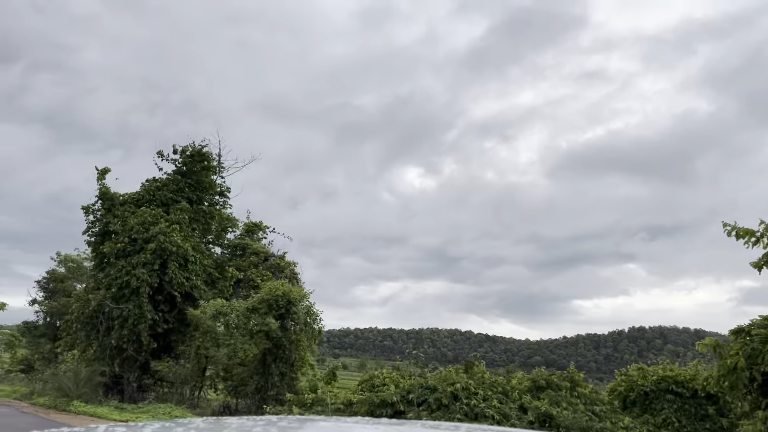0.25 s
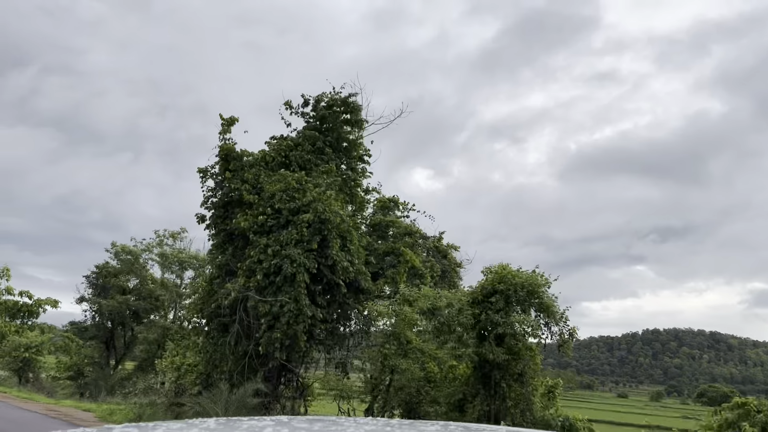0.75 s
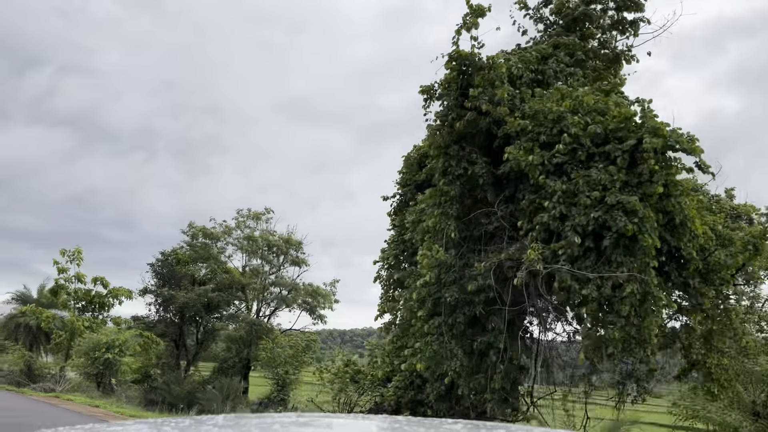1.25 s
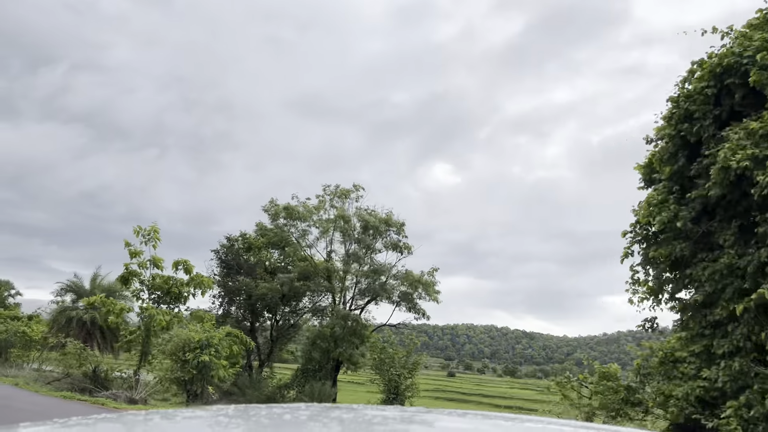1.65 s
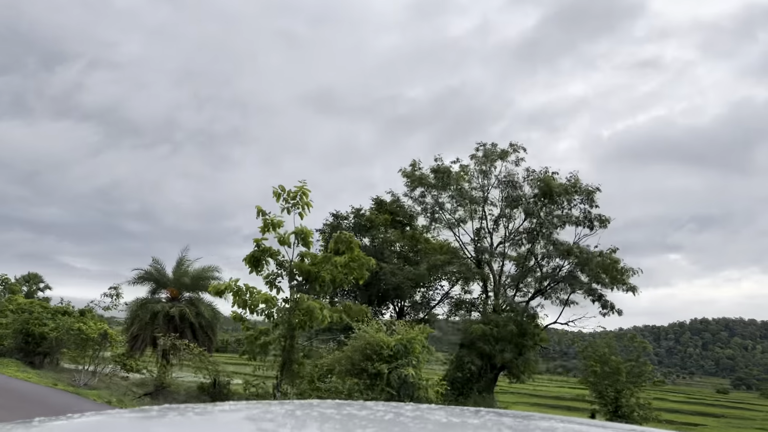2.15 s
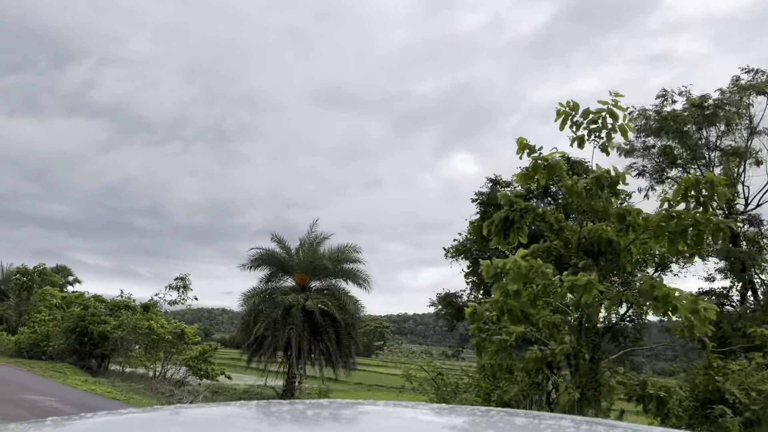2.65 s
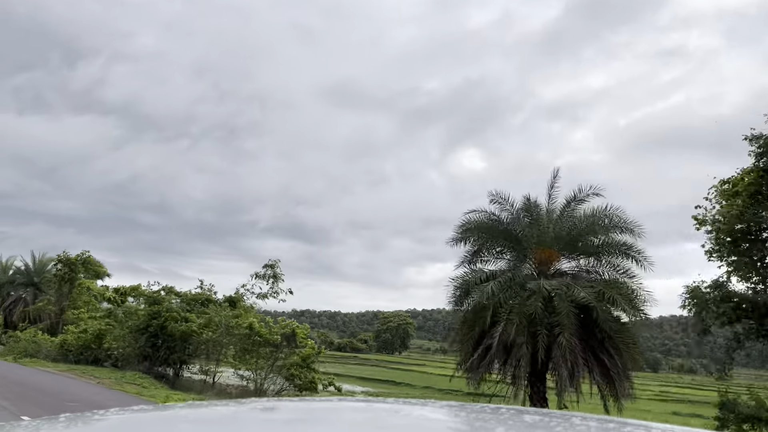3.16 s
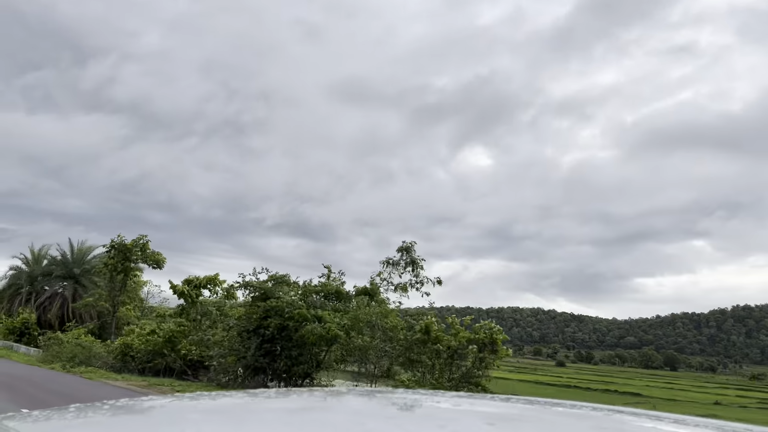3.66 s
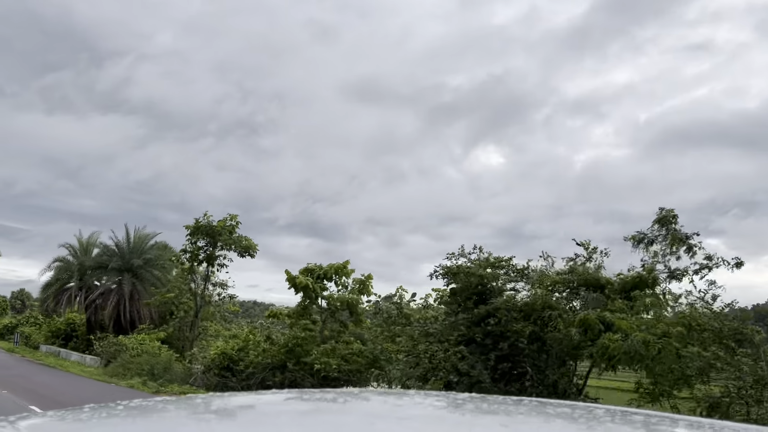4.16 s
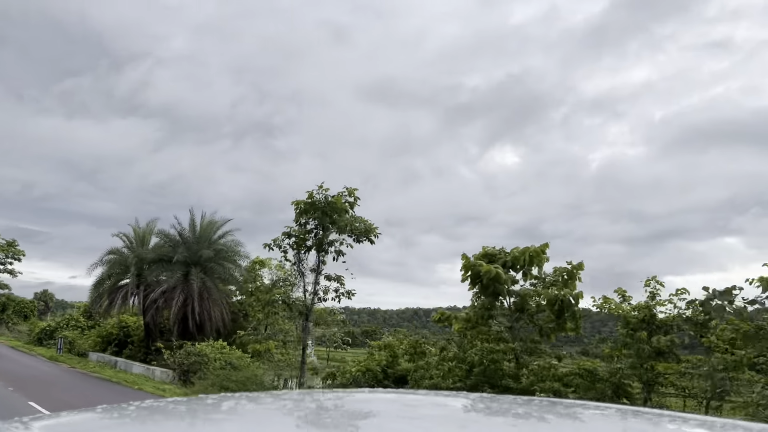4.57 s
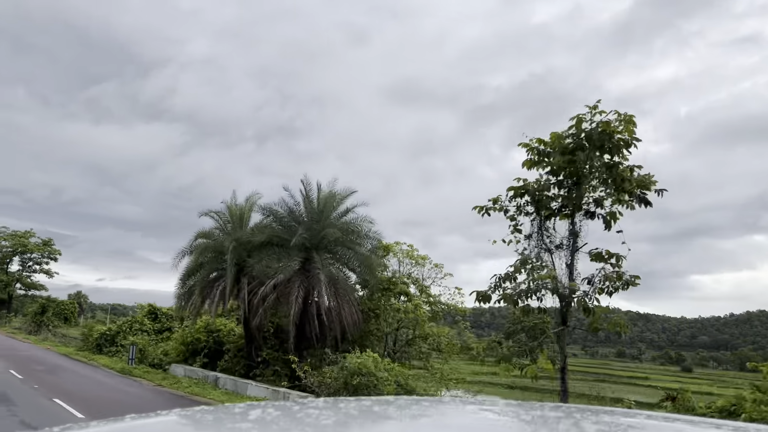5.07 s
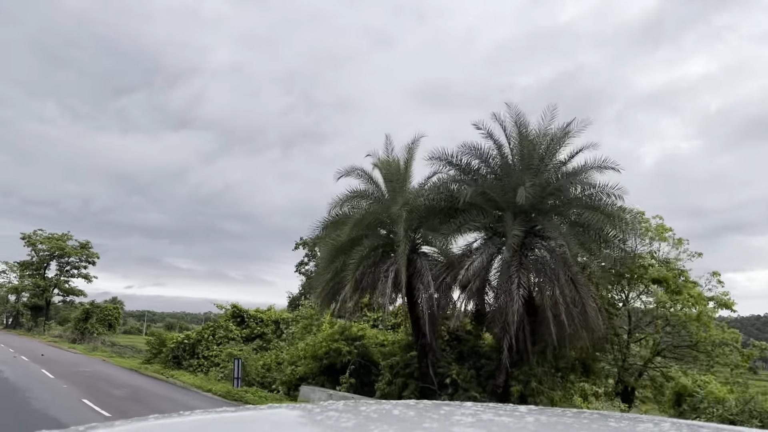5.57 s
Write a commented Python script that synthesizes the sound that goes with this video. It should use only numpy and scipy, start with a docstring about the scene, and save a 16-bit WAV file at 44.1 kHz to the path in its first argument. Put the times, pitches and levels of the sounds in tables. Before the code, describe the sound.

Steady rush of air and tyre noise from a moving car, heard on an unshielded phone held out of the window. Low rumble, breathy midrange rush and faint hiss flutter quickly. Thumps, rasps and pops cluster early, peak between about 1.2 and 1.8 seconds, thin out in the middle, then return hard near 4.9 and from 5.3 to 5.8 seconds.

```python
"""Wind on a phone held out of a moving car's window

A steady rush of tyres and slipstream: shaped noise in three parts (rumble, rush, hiss) that flutters
on the two microphone ports and swells in gusts. Big eddies hit as a rasp of resonant noise and a thump,
a swing that falls in pitch; small ones are short swings heard as pops and ticks. Flow tearing off
the case gives short, rasping bursts of resonant noise."""
import sys
import numpy as np
from scipy import signal
from scipy.fft import rfft, irfft
from scipy.io import wavfile

SR = 44100
rng = np.random.default_rng(int(sys.argv[2]) if len(sys.argv) > 2 else 0)


def generate_wav(sig):
    """Save sig (samples, or channels by samples) to the path in sys.argv[1] as 16-bit PCM at SR."""
    pcm = np.round(np.clip(np.atleast_2d(sig).T, -1, 1) * 32767).astype(np.int16)
    wavfile.write(sys.argv[1], SR, pcm)


N = 256662
TIME = np.arange(N) / SR
FREQS = np.maximum(np.arange(N // 2 + 1) * SR / N, 1)

# big eddies on the ports: (time [s], thump peak [dB], pitch at the peak [Hz], rasp level before trim [dB],
# rasp length [s], spread of the thump in log age [0.3 short to 0.7 long-tailed])
BIG_EDDIES = [(0.035, -11, 111, -19, 0.0018, 0.42), (0.073, -16, 90, -43, 0.0034, 0.38),
              (0.134, -10, 72, -23, 0.0036, 0.35), (0.273, -13, 84, -30, 0.0055, 0.54),
              (0.322, -13.5, 202, -24, 0.0062, 0.88), (0.74, -22, 87.5, -32, 0.0036, 0.34),
              (0.824, -13.5, 111, -24, 0.0064, 0.74), (0.982, -11.5, 170, -25, 0.0052, 0.39),
              (1.159, -11, 90, -42, 0.0037, .45), (1.2625, -2, 264, -19, 0.0057, 0.55),
              (1.337, -13.5, 190, -30, .003, 0.46), (1.381, -16, 115, -34, .004, .4),
              (1.433, -13, 105, -24, 0.0018, 0.64), (1.6676, -2, 119, -13.5, 0.0038, 0.49),
              (1.808, -0.5, 136, -22, 0.003, 0.55), (2.28, -15, 85, -43, 0.0024, 0.28),
              (2.3093, -9, 165, -28, 0.0045, 0.38), (3.565, -9, 192, -24.5, 0.0064, 0.47),
              (3.929, -14, 105, -22.5, 0.0048, 0.37), (4.2835, -13, 190, -21, 0.0056, 0.88),
              (4.368, -18, 82, -37, 0.0033, 0.34), (4.854, -12, 150, -26, 0.0027, 0.5),
              (4.8817, 0.5, 133, -21.5, 0.0039, 0.48), (5.072, -11.5, 114, -34, 0.0044, 0.65),
              (5.155, -25, 170, -35, .003, 0.41), (5.218, -12.5, 82, -29, .004, .4),
              (5.313, -6.5, 83.5, -40, .004, 0.34), (5.372, -9.5, 125, -27, 0.0036, 0.36),
              (5.4424, -2, 246, -19, 0.003, 0.31), (5.474, -8.5, 184, -20, 0.0025, 0.5),
              (5.505, -6.5, 310, -21, 0.003, 0.42), (5.553, -13.5, 82, -29, 0.0035, 0.45),
              (5.709, -12, 103, -38, .004, 0.39), (5.7578, -7.5, 280, -21.5, 0.0062, 0.71)]


def from_db(db):
    """Decibels to gain."""
    return 10 ** (np.asarray(db) / 20)


def rms_one(x):
    """Scale to unit power."""
    return x / np.sqrt(np.mean(x ** 2) + 1e-20)


def over_hz(points):
    """Read (Hz, value) points along a log-frequency axis."""
    hz, value = np.transpose(points)
    return np.interp(np.log(FREQS), np.log(hz), value)


def drift(rate_hz):
    """Random wobble of unit rms at around the given rate."""
    ratio = FREQS / rate_hz
    spectrum = rfft(rng.standard_normal(N))
    return rms_one(irfft(spectrum * ratio / (1 + ratio ** 2) ** 2, N))


def airflow():
    """Levels of rumble, rush and hiss in dB: all follow the slipstream and change in each gust."""
    # slipstream strength, used relative to its mean: (time [s], level [dB])
    flow_points = [(0.0, -46), (0.19, -46.5), (1.15, -47.5), (1.47, -46), (3.63, -51), (3.71, -51),
                   (4.73, -51), (5.24, -48.5), (5.82, -50)]
    # gusts: (crest time [s], Gaussian half length [s], rush rise [dB], rumble rise [dB], hiss rise [dB])
    gusts = [(0.114, 0.0755, 1.5, 3, 0), (0.708, 0.075, 4, 5, 4), (1.299, 0.0551, 5, 5.5, 5),
             (1.82, 0.105, 2.5, -0.5, 2), (2.316, 0.049, 4, 6.5, 2), (2.613, 0.0775, 2.5, 3, 1.5),
             (3.97, .11, 4, 3.5, 0.5), (4.388, 0.08, 0, 2, 1), (4.924, 0.0686, 3.5, 3, 0.5),
             (5.25, .09, 4, 1.5, 1.5), (5.65, 0.161, 2.5, 4, 0.2)]
    # level at mean flow outside gusts [dB], gain per dB of flow [dB]
    rumble_db, rumble_follows = -26, 0.76
    rush_db, rush_follows = -27.5, 0.43
    hiss_db, hiss_follows = -42, 0.82

    flow_db = np.interp(TIME, *np.transpose(flow_points))
    flow_db = flow_db - flow_db.mean()
    rises = np.zeros((3, N))
    for crest_s, half_length_s, *rises_db in gusts:
        swell = np.exp(-.5 * ((TIME - crest_s) / half_length_s) ** 2)
        rises += np.outer(rises_db, swell)
    rush_rise, rumble_rise, hiss_rise = rises
    return (rumble_db + rumble_follows * flow_db + rumble_rise,
            rush_db + rush_follows * flow_db + rush_rise,
            hiss_db + hiss_follows * flow_db + hiss_rise)


def air_noise(colour):
    """Port noise: long waves arrive alike; short ones differ, higher ones earlier on the right."""
    # left-right likeness, clipped to 0-1: (frequency [Hz], likeness [-])
    likeness = [(420, 1), (520, 0.87), (700, 0.29), (1000, 0.32), (1400, -0.45), (1700, -0.1), (2000, 0.52),
                (2700, 0.2), (3700, -0.46), (4600, 0.1), (6000, 0.4), (7500, 0.37), (9000, 1.8),
                (11000, -0.8)]
    # port balance: (frequency [Hz], left minus right [dB])
    balance = [(350, 0), (500, 0), (1200, -0.5), (1680, 3), (1820, 0.5), (2200, 1), (3500, 3.5), (5300, 7),
               (7200, -1), (8500, 0)]
    port_lag_s, lag_above_hz = .00037, 3520
    lag_top_hz = 3 / port_lag_s   # the phase shift grows no further above this

    alike = np.clip(over_hz(likeness), 0, 1)
    mid, side = rfft(rng.standard_normal((2, N)))
    signs = np.array([[1], [-1]])   # left, right
    ports = np.sqrt(1 + alike) * mid + signs * np.sqrt(1 - alike) * side
    gain = from_db(over_hz(colour) + signs * over_hz(balance) / 2)
    lag_s = port_lag_s / (1 + (lag_above_hz / FREQS) ** 20)
    shift = np.exp(-1j * np.pi * signs * np.minimum(FREQS, lag_top_hz) * lag_s)
    return rms_one(irfft(ports * gain * shift, N))


def patchy(noise, patchy_db, rate_hz, lowest_hz=250, count=11):
    """Eddies of different sizes come and go on their own: each half octave flutters by itself."""
    spectrum = rfft(noise)
    band = np.clip(2 * np.log2(FREQS / lowest_hz), 0, count - 1)
    total = np.zeros((2, N))
    for k in range(count):
        part = irfft(spectrum * np.maximum(1 - abs(band - k), 0), N)
        total += part * from_db(patchy_db * drift(rate_hz))
    return rms_one(total)


def stream(noise, level_db, flutter_db):
    """One part of the air noise, fluttering about its level."""
    return from_db(level_db) * rms_one(from_db(flutter_db)) * noise


def add_eddy(track, s, peak_db, hz, turns, spread):
    """A pressure swing whose cycles lengthen as the eddy widens and drifts off."""
    front_share = 0.76   # builds up faster than it drifts off
    span = slice(max(int((s - turns / hz) * SR), 0), int((s + 10 / hz) * SR))
    log_age = np.log(np.maximum(1 + (TIME[span] - s) * hz / turns, 1e-6))
    width = spread * np.where(log_age < 0, front_share, 1)
    envelope = np.exp(-.5 * (log_age / width) ** 2)
    track[span] -= from_db(peak_db) * envelope * np.sin(2 * np.pi * turns * log_age)


def small_eddies(carrier_db, over_db, low_hz, high_hz, count, scatter_db=-1.5, spread=0.41):
    """Lesser eddies come at random, as strong as the turbulence that carries them."""
    out = np.zeros(N)
    for when, size, strength in rng.random((count, 3)):
        peak_db = carrier_db[int(when * N)] + over_db + scatter_db * (2 * strength - 1)
        hz = low_hz * (high_hz / low_hz) ** size
        add_eddy(out, when * N / SR, peak_db, hz, turns=2.6, spread=spread)
    return out


def stray_bursts(carrier_db, count, over_db=1.5, length_s=0.002, low_hz=650, high_hz=1900):
    """Faint sputters at random, oftener and louder in strong flow: (s, dB, length s, centre Hz)."""
    chance = np.cumsum(from_db(carrier_db) ** 2)
    rows = []
    for when, size, stretch in rng.random((count, 3)):
        at = np.searchsorted(chance, when * chance[-1])
        hz = low_hz * (high_hz / low_hz) ** size
        rows.append((at / SR, carrier_db[at] + over_db, length_s * (.5 + stretch), hz))
    return rows


def buffet_bursts():
    """Each big eddy rasps just before it thumps: (s, dB, length s, centre Hz)."""
    lead_cycles, rasp_hz = 0.57, 715
    return [(s - lead_cycles / hz, rasp_db, length_s, rasp_hz)
            for s, _, hz, rasp_db, length_s, _ in BIG_EDDIES]


def rasps(bursts, level_db, sharpness, grain_db=2.0, grain_hz=380, rise=0.79, fall=2.06):
    """Coarse noise centred on the vortex-shedding rate; each swell rises faster than it falls."""
    # noise colour: (frequency [Hz], relative level per Hz [dB])
    rasp_colour = [(150, 17.5), (400, 10), (1200, 8.5), (1700, 8), (2100, -0.5), (3500, -9), (4300, -14),
                   (5500, -17), (8000, -25), (12000, -45)]
    noise = air_noise(rasp_colour)
    out = np.zeros((2, N))
    grain = from_db(grain_db * drift(grain_hz))
    for s, crest_db, length_s, hz in bursts:
        span = slice(max(int((s - .1) * SR), 0), int((s + .1) * SR))
        shed = signal.lfilter(*signal.iirpeak(hz, sharpness, fs=SR), noise[:, span])
        since_s = TIME[span] - s
        swell = np.exp(-.5 * (since_s / (length_s * np.where(since_s < 0, rise, fall))) ** 2)
        burst = rms_one(swell * shed * grain[span])
        swell_rms = np.sqrt(np.mean(swell ** 2))   # refers the level to the crest
        out[:, span] += from_db(crest_db + level_db) * swell_rms * burst
    return out


def sharp_pops():
    """Small, tight eddies crack on the ports, often harder on one than on the other."""
    # pops: (time [s], peak before trim and port share [dB], pitch at the peak [Hz], left minus right [dB])
    pop_rows = [(0.0648, -13, 900, 2), (0.0926, -21, 2600, -7), (0.1226, -18, 2800, 12),
                (0.1275, -22, 1050, -5), (0.2085, -18, 2200, 12), (0.2431, -13, 733, 0),
                (0.2598, -12.5, 850, 2), (0.5141, -20.5, 780, -6), (0.6034, -14, 775, 2),
                (1.2144, -13.5, 1140, -4), (1.2606, -13, 2970, 3), (1.2655, -7.5, 1500, 2),
                (1.303, -10.5, 1100, 3), (1.3088, -12.5, 650, 0), (1.3532, -12, 2240, 4),
                (1.3702, -16.5, 1010, -1), (1.4258, -16.5, 2100, 7), (1.6097, -13, 1060, -4),
                (1.6612, -10.5, 2700, 5), (1.6635, -3.5, 580, 1), (1.6682, -14, 2400, 2),
                (1.7925, -7, 1110, -5), (1.796, -17, 950, -1), (1.7997, -5, 870, 9), (1.8025, -15, 450, 3),
                (2.2766, -13, 970, 2), (2.2987, -18, 2700, 13), (2.305, -14, 1150, 3),
                (2.3088, -8, 627, -2), (2.3097, -18, 2940, 7), (2.357, -10, 696, 0), (2.5203, -14, 650, -4),
                (2.6342, -16, 800, -2), (2.8895, -14.5, 990, -1), (3.0733, -16.5, 925, -2),
                (3.2408, -16, 700, -4), (4.2785, -15, 905, 3), (4.8766, -11.5, 1170, 6),
                (4.8814, -16.5, 2200, 3), (5.2104, -22, 940, -1), (5.3634, -17, 2540, 17),
                (5.4452, -23, 3110, 8), (5.4595, -19, 990, 0), (5.4765, -10.5, 720, 4),
                (5.5083, -8, 1040, 2), (5.5372, -13, 1080, 5), (5.7463, -24, 3000, -10),
                (5.752, -22, 2500, 4)]
    trim_db, turns_at_1khz, spread = -1, 2.1, 0.32
    ring = 0.18   # exponent: how much longer higher pops ring, in swings
    out = np.zeros((2, N))
    for s, peak_db, hz, pan_db in pop_rows:
        shares = rms_one(from_db(np.array([pan_db, -pan_db]) / 2))
        turns = turns_at_1khz * (hz / 1000) ** ring
        for port, share in zip(out, shares):
            add_eddy(port, s, peak_db + trim_db + 20 * np.log10(share), hz, turns, spread)
    return out


def thumps(turns=1.49):
    """Big eddies, felt alike by both ports; a weaker, wider eddy follows each fast, high-pitched one."""
    wake_db, wake_delay_s, wake_hz, wake_spread = -13, 0.011, 69, 0.32
    wake_above_hz = 148
    out = np.zeros(N)
    for s, peak_db, hz, _, _, spread in BIG_EDDIES:
        add_eddy(out, s, peak_db, hz, turns, spread)
        if hz > wake_above_hz:
            add_eddy(out, s + wake_delay_s, peak_db + wake_db, wake_hz, turns, wake_spread)
    return out


def scene():
    """Rumble, rush and hiss flutter, more deeply in gusts; eddies and rasps ride on top."""
    # noise colours: (frequency [Hz], relative level per Hz [dB])
    rumble_colour = [(20, -35), (30, -21), (40, -9.5), (63, 1), (100, -3), (160, -7.5), (230, -9.5),
                     (330, -19.5), (600, -73)]
    rush_colour = [(130, -91), (220, -2.5), (300, 2), (450, 0.5), (720, -0.5), (1000, -2.5), (1400, -5),
                   (1680, -7.5), (1830, -15), (2600, -65)]
    hiss_colour = [(1400, -42), (1850, 0.4), (2400, -0.5), (3200, -3.5), (4000, -7.5), (5200, -11.5),
                   (6700, -16.5), (8000, -18.5), (9500, -23), (11000, -21), (12300, -48), (15000, -28)]
    # flow tearing off the case: (time [s], crest rms before trim [dB], length [s], centre [Hz])
    tears = [(.208, -22, 0.0052, 1250), (.209, -32, .003, 2500), (.3165, -24.5, .002, 600),
             (.672, -35, 0.0066, 2420), (.716, -25.5, 0.0056, 2470), (.718, -24.5, 0.01, 950),
             (.729, -37, .004, 2500), (.738, -30, 0.0035, 1300), (.978, -30, 0.0065, 950),
             (1.238, -31, .003, 2700), (1.25, -19, 0.0055, 1150), (1.263, -19.5, .0025, 2100),
             (1.302, -22, .005, 750), (1.3055, -17.5, 0.002, 2040), (1.317, -24, .004, 1150),
             (1.371, -22, 0.0028, 1390), (1.663, -22.5, 0.0023, 2300), (1.6635, -13.5, 0.0021, 490),
             (1.6635, -29, .0022, 3900), (1.7945, -21, 0.0037, 1100), (1.801, -29, .004, 2100),
             (2.3, -25.5, 0.0031, 2750), (2.321, -24, 0.0064, 480), (2.632, -27.5, 0.002, 2200),
             (3.904, -33.5, 0.0057, 2630), (4.034, -36, 0.0053, 2390), (4.061, -29.5, .006, 1600),
             (4.08, -27.5, .012, 780), (5.3555, -20, 0.0017, 1050), (5.361, -18.5, 0.002, 796),
             (5.446, -27, .002, 1650), (5.445, -30.5, .002, 3400), (5.503, -27, .002, 1600),
             (5.503, -33.5, .002, 3200), (5.751, -32, .0025, 3400), (5.7545, -22, 0.0022, 1600)]

    rumble_db, rush_db, hiss_db = airflow()
    gust = from_db(.5 * (rush_db - rush_db.mean()))
    flutter_db = gust * (drift(59) + 0.53 * drift(12.0))
    rumble_flutter_db = 1.3 * gust * drift(21) + 0.7 * flutter_db
    rumble = stream(air_noise(rumble_colour), rumble_db, rumble_flutter_db)
    rush_noise = patchy(air_noise(rush_colour), patchy_db=1.5, rate_hz=27.3)
    rush = stream(rush_noise, rush_db, 0.78 * flutter_db)
    hiss_noise = patchy(air_noise(hiss_colour), patchy_db=0.75, rate_hz=19, lowest_hz=1790, count=5)
    hiss = stream(hiss_noise, hiss_db, 0.88 * flutter_db)

    puffs = small_eddies(rumble_db, over_db=-0.5, low_hz=148, high_hz=560, count=110)
    # the tiniest eddies touch only one port
    pops = np.array([small_eddies(rush_db, over_db=8.0, low_hz=584, high_hz=1380, count=70)
                     for port in range(2)])
    ticks = np.array([small_eddies(hiss_db, over_db=19.5, low_hz=2000, high_hz=3600, count=35, spread=0.3)
                      for port in range(2)])

    bursts = buffet_bursts() + stray_bursts(rush_db, count=10)
    eddy_rasps = rasps(bursts, level_db=0.4, sharpness=1.3)
    tearing = rasps(tears, level_db=1.1, sharpness=1.63)
    air = rumble + rush + hiss
    return air + puffs + pops + ticks + sharp_pops() + thumps() + eddy_rasps + tearing


def record(dry, ceiling=0.97, low_cut_hz=31, mono_below_hz=340, cutoff_hz=15400):
    """The phone folds bass to mono, loses the deepest part, rounds the strongest swings, cuts the top."""
    mid = dry.mean(axis=0)
    side = irfft(rfft(dry - mid) / (1 + (mono_below_hz / FREQS) ** 10), N)
    low_cut = signal.butter(2, low_cut_hz, "high", fs=SR, output="sos")
    thinned = signal.sosfilt(low_cut, mid + side)
    rounded = thinned / (1 + (thinned / ceiling) ** 6) ** (1 / 6)
    top_cut = signal.ellip(10, .1, 70, cutoff_hz, fs=SR, output="sos")
    return signal.sosfilt(top_cut, rounded)


dry = scene()
out = record(dry)
generate_wav(out)
```